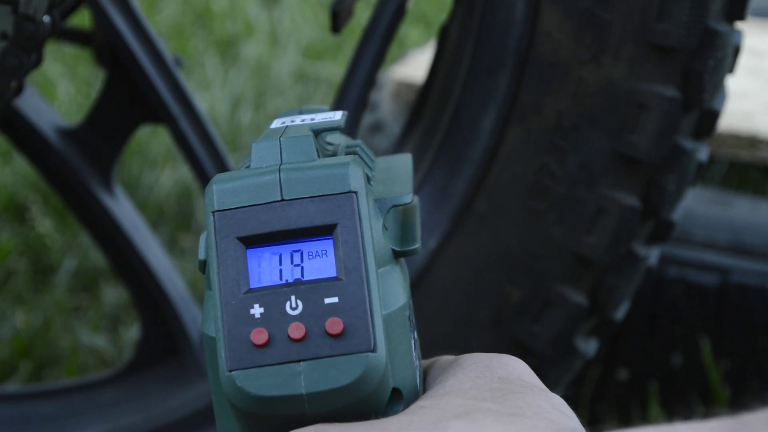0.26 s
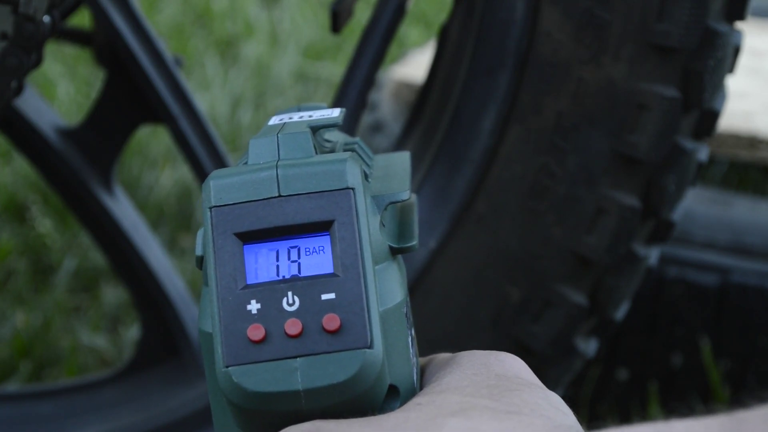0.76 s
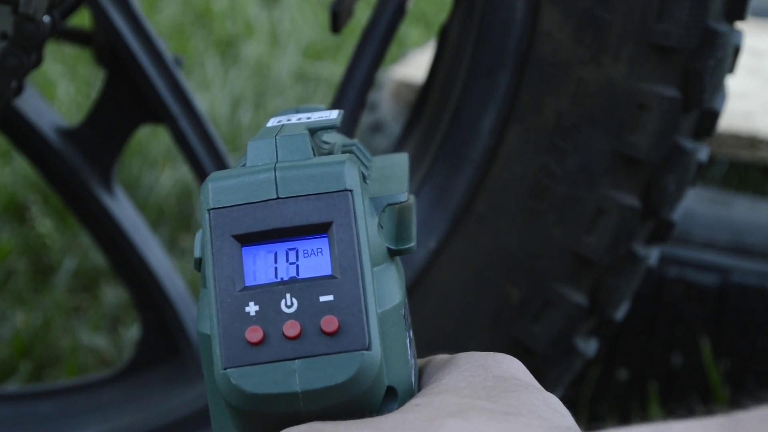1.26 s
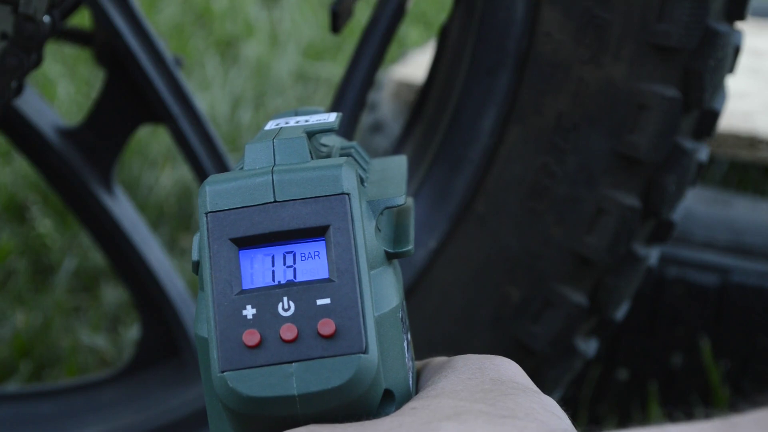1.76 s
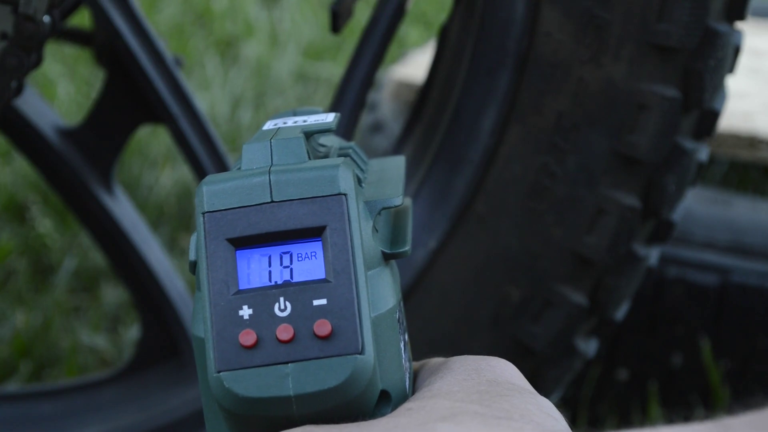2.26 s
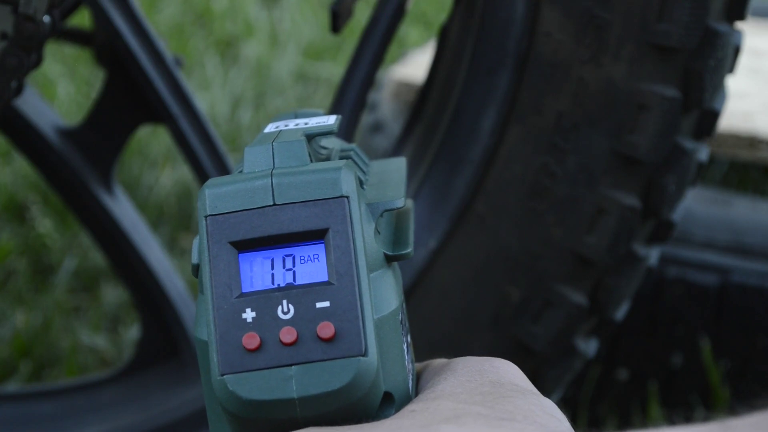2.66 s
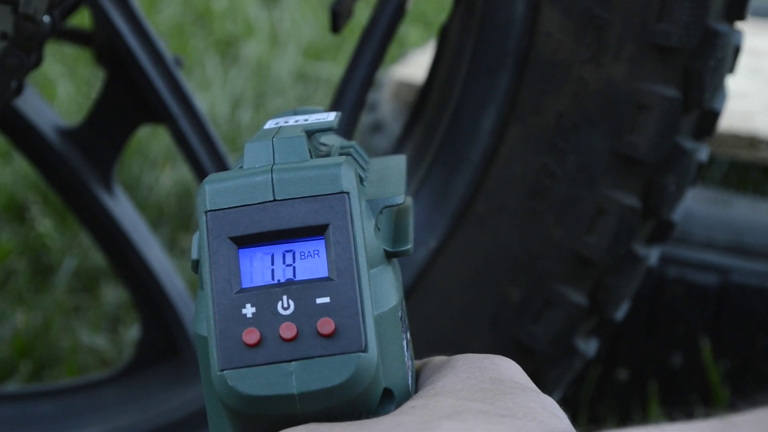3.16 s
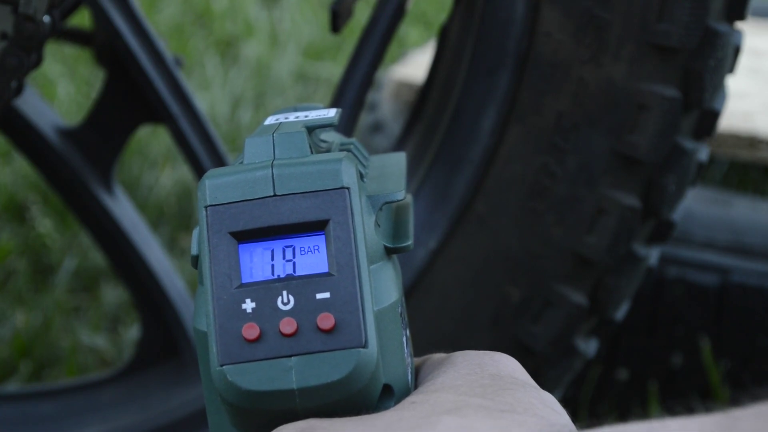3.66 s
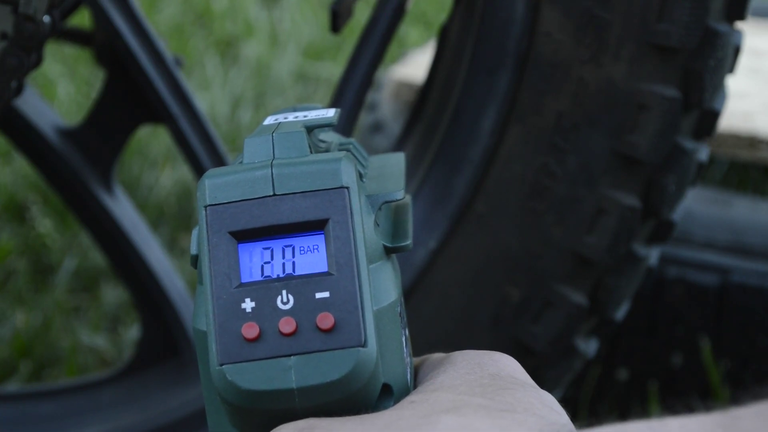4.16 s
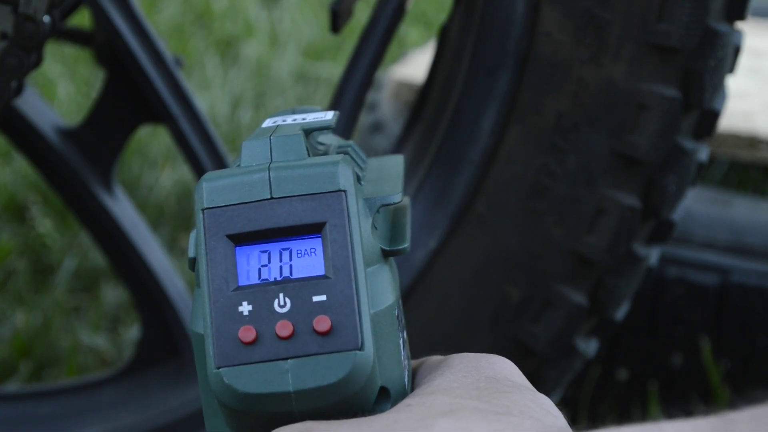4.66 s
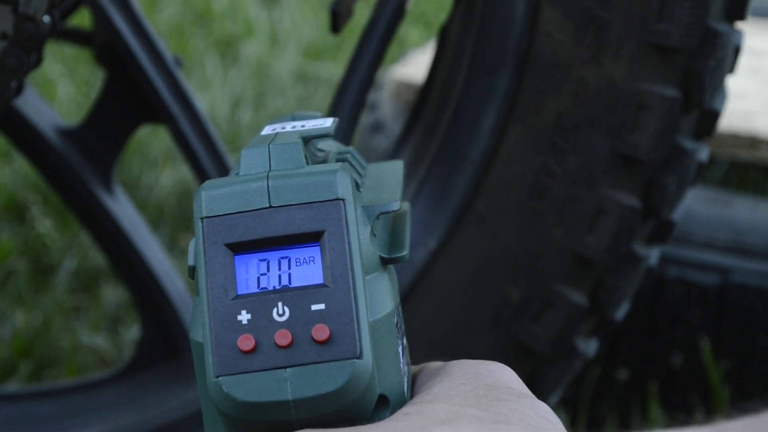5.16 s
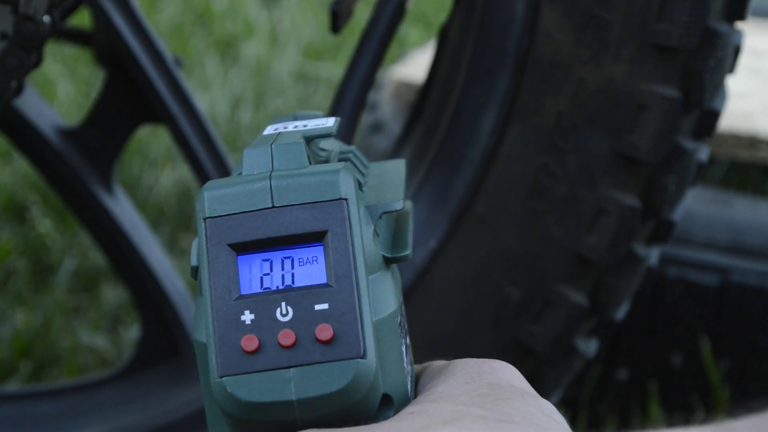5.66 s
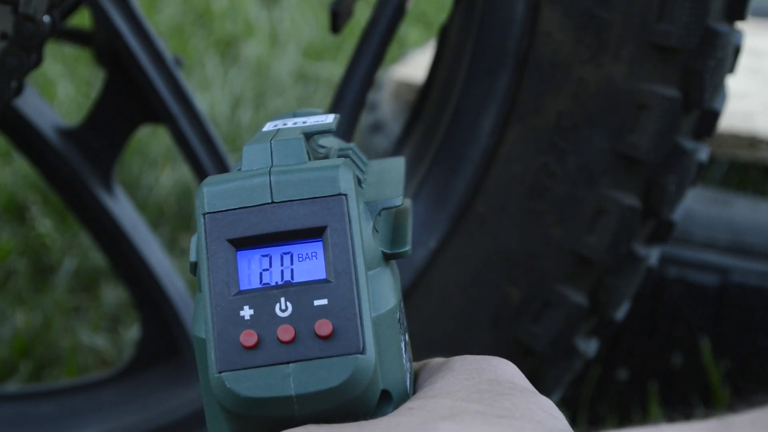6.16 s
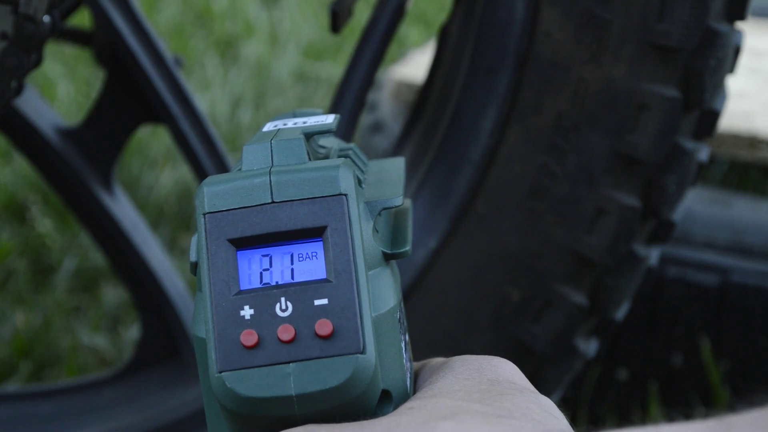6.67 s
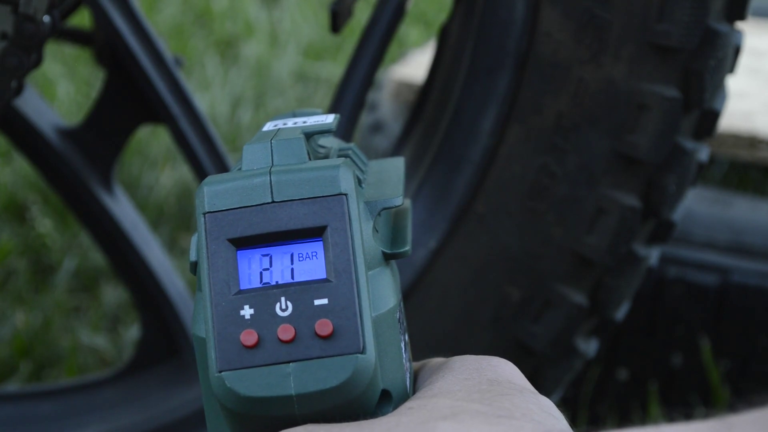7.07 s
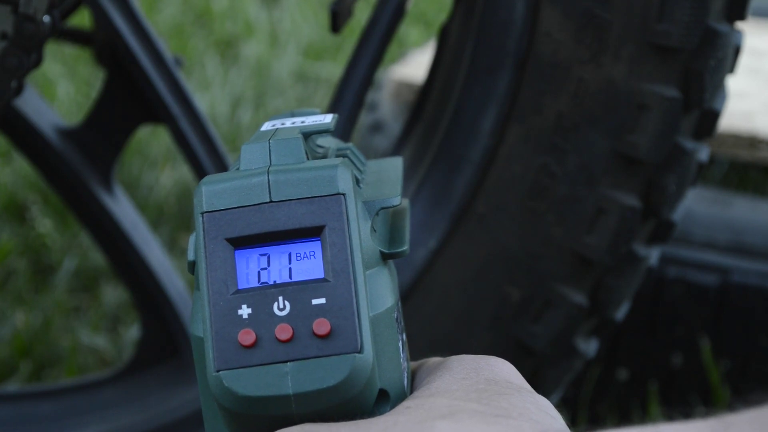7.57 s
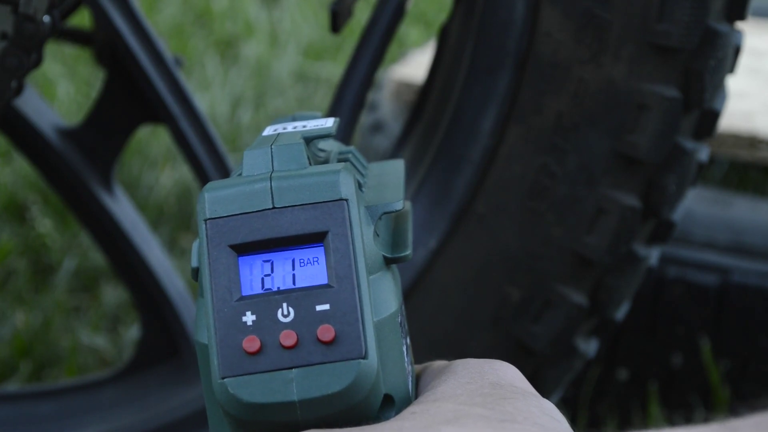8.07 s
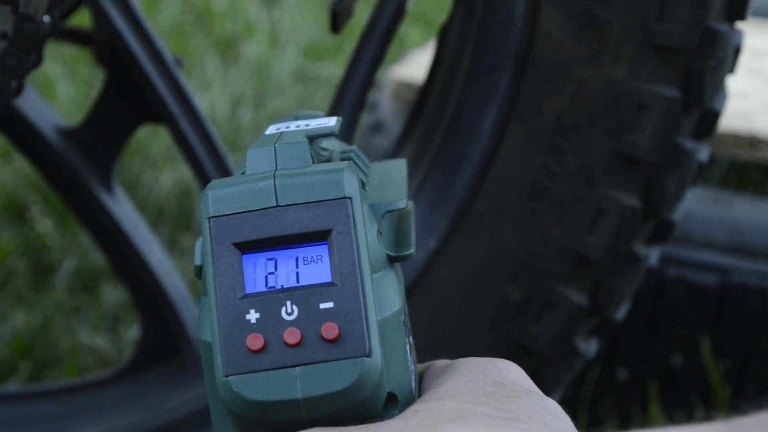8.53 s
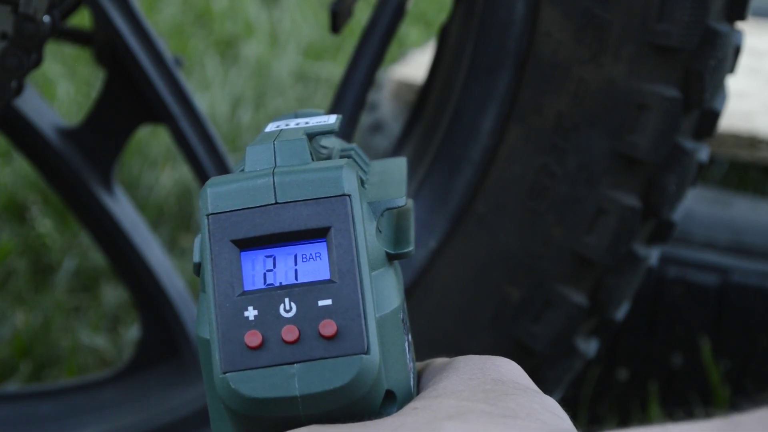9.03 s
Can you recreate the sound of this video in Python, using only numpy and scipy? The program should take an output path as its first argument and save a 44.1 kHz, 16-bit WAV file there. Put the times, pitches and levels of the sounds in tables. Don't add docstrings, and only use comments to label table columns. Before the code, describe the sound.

Loud, steady chatter of a cordless piston inflator working against pressure outdoors, while a faint distant engine fades behind it at the start.

```python
import sys
import numpy as np
from scipy import signal
from scipy.fft import rfft, irfft
from scipy.io import wavfile
from scipy.ndimage import uniform_filter1d

SR = 44100
rng = np.random.default_rng(int(sys.argv[2]) if len(sys.argv) > 2 else 0)


def convert_level_to_amplitude(level_db):
    exponent = np.asarray(level_db, float) / 20
    return 10 ** exponent


def master_out(mix):
    frames = np.transpose(np.atleast_2d(mix))
    ceiling = np.clip(frames, -1, 1)
    pcm = np.round(ceiling * 32767).astype(np.int16)
    wavfile.write(sys.argv[1], SR, pcm)


N = 410130

# time in s, speed in turns/min.
CRANK_SPEED = [(0, 3459.55), (.75, 3465.82), (1.5, 3465.19), (2.4, 3457.98), (3.15, 3465.27),
               (4.05, 3458.18), (4.65, 3460.08), (5.55, 3456.74), (6, 3458.66), (6.6, 3457.74),
               (7.2, 3451.64), (7.5, 3457.44), (8.55, 3454.77), (9.3, 3446.43)]
START_TURN = .0524
PINION_TEETH, WHEEL_TEETH = 11, 49
# time in s, length in s, lag in turns.
STUMBLE = (4.9, 0.017, 0.0053)

# start angle in turns, rise in turns, hold in turns, fall in turns, idle level in dB.
TEETH_STROKE = (0.53, 0.11, 0.24, 0.37, -17)
RATTLE_STROKE = (.35, .17, .24, .52, -17)
AIR_STROKE = (-0.1, 0.5, 0.6, 0.7, -2.5)
MESH_STROKE = (0.49, .2, 0.08, 0.34, -23)
# angle in turns, width in turns, level over full load in dB.
JOLTS = [
    (0.448, 0.014, -9),
    (.05, 0.028, -1),
]
# teeth in dB, rattle in dB, air in dB, mesh in dB.
JOLT_SHARE = (-1.5, -31, -23, -12)

# frequency in Hz, width in Hz, level in dB.
CASE_MODES = [(1426, 590, -6), (2023, 110, -8), (2672, 84, 1.5), (3220, 236, -1.5), (3778, 143, -4.5),
              (3990, 130, -11), (4530, 100, -8), (4890, 67, -13), (5970, 100, -20), (6360, 67, -41.5),
              (6800, 34, -12.5)]
# frequency in Hz, width in Hz, level in dB.
METAL_MODES = [(4240, 400, -1.5), (7300, 1200, -40), (8300, 120, 4.5), (8850, 200, 4), (9460, 320, 7),
               (10340, 220, 4), (10300, 190, -2), (11220, 160, 3.5), (12400, 600, -33), (13800, 1200, -26)]
# frequency in Hz, width in Hz, level in dB.
WHINE_MODES = [(2686, 113, 5.5), (3180, 410, -1.5), (4150, 120, -11), (4380, 73, -14), (5180, 91, -11.5),
               (5770, 300, -9), (6850, 91, -16), (7800, 110, -17), (8470, 110, -17), (8600, 220, -8),
               (9550, 190, -13.5), (9710, 210, -10), (10300, 190, -27), (11140, 150, -16)]
# time in s, frequency in Hz.
PANEL_MODE = [(0, 5570), (1, 5620), (3.4, 5586), (4.6, 5553), (9.3, 5470)]
KNOCKS = [
    (-.105, -0.103, -0.44),
    (-.004, 0.014, 1),
    (0.052, 0.066, -0.77),
    (0.093, 0.102, 0.77),
    (0.567, 0.565, -0.17),
]
# frequency in Hz, width in Hz, level in dB.
CYLINDER_MODES = [(278, 190, -7), (418, 59, -5.5), (510, 68, -8.5), (572.6, 35, 0), (706.3, 36, -2.5),
                  (813.5, 47, 1.5), (1150, 260, -8.5), (1022, 146, -4), (1475, 200, -6.5), (1960, 210, -6),
                  (3150, 370, -2)]
# frequency in Hz, density in dB per Hz.
HISS_COLOUR = [(330, -29), (750, -0.5), (1600, -4.5), (3100, 2), (4500, -2), (6000, -16.5), (9500, -12),
               (12000, -55)]
# crank order, rms level in dB, lag in turns.
SHAKE = [(1, -54, -0.0038), (2, -47, -0.12), (3, -61, -0.027), (4, -54.5, -0.038), (5, -54.5, 0.0092)]
# motor order, rms level in dB.
HUM = [(3, -51), (6, -67)]

# frequency in Hz, width in Hz, depth in dB.
DIPS = [(990, 33, -1.2), (1797, 133, -6.5), (2086, 54, -3), (2845, 118, -7.5), (4290, 90, -5),
        (5970, 210, -10), (7010, 620, -4), (7560, 560, -3), (10800, 300, -5), (11830, 260, -9),
        (14700, 500, -7)]
# time in s, speed in turns/s, level in dB.
FAR_ENGINE = [(0, 24.1, -58), (.6, 23.3, -59), (1.2, 21, -60), (1.5, 25.5, -68), (2.5, 27, -66),
              (3.2, 19, -68), (4.2, 22, -72), (5.2, 19.4, -76), (9.3, 18, -84)]
# engine order, level in dB.
ENGINE_ORDERS = [(2, -2), (3, -7), (4, -4), (5.5, -3), (6, -2), (6.5, -9), (8, -11), (9.5, -6), (10, -4)]
ROAD_OVER_ENGINE_DB, ROAD_FLOOR_DB, ROAD_SWELL_DB = 1.5, -77, 2


def crank():
    time_s, length_s, lag = STUMBLE
    stumble = lag * np.exp(-((np.arange(N) / SR - time_s) / length_s) ** 2)
    driven = np.cumsum(curve(CRANK_SPEED)) / 60 / SR
    return START_TURN - stumble + driven + 0.00073 * drift(900)


def surge(turns, depth, fastest=0.61):
    return turns + depth / (2 * np.pi) * np.sin(2 * np.pi * (turns - fastest))


def load(turns, stroke, jolt_db):
    start, rise, hold, fall, idle_db = stroke
    since = (turns - start) % 1
    full = np.clip(np.minimum(since / rise, (rise + hold + fall - since) / fall), 0, 1)
    jolts = 0
    for angle, width, db in JOLTS:
        off = (turns - angle + .5) % 1 - .5
        jolts = jolts + convert_level_to_amplitude(db) * np.exp(-(off / width) ** 2)
    return convert_level_to_amplitude(idle_db * (1 - full)) + convert_level_to_amplitude(jolt_db) * jolts


def gears(turns):
    us = SR * 1e-6
    mesh = WHEEL_TEETH * surge(turns, 0.1302)
    tooth = np.arange(np.ceil(mesh[0]), mesh[-1]).astype(int)
    at = np.interp(tooth, mesh, np.arange(N))
    angle = np.interp(at, np.arange(N), turns)
    wheel = rng.standard_normal((WHEEL_TEETH, 2))[tooth % WHEEL_TEETH].T
    pinion = rng.standard_normal((PINION_TEETH, 2))[tooth % PINION_TEETH].T
    jitter, rebound_jitter, rattle_spread = rng.standard_normal((3, len(tooth)))

    mesh_force = load(angle, MESH_STROKE, JOLT_SHARE[3]) * convert_level_to_amplitude(6.3 * wheel[1])
    steady = clicks(at + us * 25 * wheel[0], mesh_force)
    whine = convert_level_to_amplitude(-35.5) * ring(steady, WHINE_MODES)

    proud = clicks(at, 1. * (tooth % WHEEL_TEETH == 29))
    panel = convert_level_to_amplitude(-46) * resonate(proud, curve(PANEL_MODE), 94)

    strike = at + us * (16 * jitter + 22 * wheel[0] + 12 * pinion[0])
    force = load(angle, TEETH_STROKE, JOLT_SHARE[0]) * convert_level_to_amplitude(5 * wheel[1] + 1.1 * pinion[1])
    case = convert_level_to_amplitude(-28.5) * ring(clicks(strike, force), CASE_MODES)

    flutter = evened(uniform_filter1d(rng.standard_normal(len(tooth)), 120))
    rebound = strike + us * 30 * rebound_jitter
    chatter_db = 5 * rattle_spread + 1.4 * wheel[1] + 0.5 * flutter
    chatter = load(angle, RATTLE_STROKE, JOLT_SHARE[1]) * convert_level_to_amplitude(chatter_db)
    rattle = convert_level_to_amplitude(-44.5) * ring(clicks(rebound, chatter), METAL_MODES)
    return whine + panel + case + rattle


def valve(turns, jitter_turns=0.0027, spread_db=0.43):
    turn = np.arange(np.ceil(turns[-1]) + 1)[:, None]
    even, odd, strength = np.transpose(KNOCKS)
    jitter, spread = rng.standard_normal((2, len(turn), len(KNOCKS)))
    angle = turn + np.where(turn % 2, odd, even) + jitter_turns * jitter
    at = np.interp(angle, turns, np.arange(N), -99, N + 99)
    size = strength * convert_level_to_amplitude(spread_db * spread)
    return convert_level_to_amplitude(-33.5) * ring(clicks(at.ravel(), size.ravel()), CYLINDER_MODES)


def hiss(turns):
    hz, db = np.transpose(HISS_COLOUR)
    bins = np.fft.rfftfreq(N, 1 / SR)
    colour = convert_level_to_amplitude(np.interp(np.log(bins + 1), np.log(hz), db))
    air = rng.standard_normal(N) * load(turns, AIR_STROKE, JOLT_SHARE[2])
    return convert_level_to_amplitude(-35.5) * evened(irfft(rfft(air) * colour, N))


def shake_and_hum(turns):
    rotor = surge(turns, 0.016) * WHEEL_TEETH / PINION_TEETH
    shake = sum(convert_level_to_amplitude(db) * np.cos(2 * np.pi * order * (turns - lag)) for order, db, lag in SHAKE)
    hum = sum(convert_level_to_amplitude(db) * np.sin(2 * np.pi * order * rotor) for order, db in HUM)
    return np.sqrt(2) * (shake + hum)


def surroundings(x, scatter_db=-5, t60=0.038):
    bins = np.fft.rfftfreq(N, 1 / SR)
    dips_db = sum(db / (1 + (2 * (bins - hz) / width) ** 2) for hz, width, db in DIPS)
    t = np.arange(2000) / SR
    tail = rng.standard_normal(len(t)) * convert_level_to_amplitude(-60 * t / t60) * (t > .0004)
    tail = np.diff(tail, 2)
    paths = 1 + convert_level_to_amplitude(scatter_db) * rfft(tail / np.linalg.norm(tail), N)
    smear = paths / abs(paths)
    return irfft(rfft(x) * smear * convert_level_to_amplitude(dips_db), N)


def far_engine():
    turns = np.cumsum(curve(FAR_ENGINE)) / SR
    tones = 0
    for order, db in ENGINE_ORDERS:
        level = convert_level_to_amplitude(db + 2.5 * drift(5000))
        tones = tones + level * np.sin(2 * np.pi * (order * turns + rng.random()))
    return convert_level_to_amplitude(curve(FAR_ENGINE, axis=2)) * tones


def road():
    rumble = ring(rng.standard_normal(N), [(95, 30, -1), (135, 31, -6), (218, 31, -4)])
    rumble = ring(rumble, [(120, 120, 0)])
    level = convert_level_to_amplitude(curve(FAR_ENGINE, axis=2) + ROAD_OVER_ENGINE_DB) + convert_level_to_amplitude(ROAD_FLOOR_DB)
    return level * convert_level_to_amplitude(ROAD_SWELL_DB * drift(9000)) * rumble


def evened(x):
    return x / np.sqrt(np.mean(x ** 2) + 1e-20)


def drift(samples):
    noise = rng.standard_normal(N)
    return evened(uniform_filter1d(uniform_filter1d(noise, samples), samples))


def curve(rows, axis=1):
    rows = np.array(rows)
    return np.interp(np.arange(N) / SR, rows[:, 0], rows[:, axis])


def clicks(at, size):
    near = np.floor(at)[:, None] + np.arange(-8, 9)
    off = near - at[:, None]
    shape = np.sinc(off) * np.cos(np.pi * off / 18) ** 2
    ok = (near >= 0) & (near < N)
    return np.bincount(near[ok].astype(int), (size[:, None] * shape)[ok], N)


def ring(x, modes):
    hz = abs(np.fft.fftfreq(8192, 1 / SR))
    power = sum(convert_level_to_amplitude(db) ** 2 / (1 + ((hz ** 2 - f ** 2) / (hz + 1) / width) ** 2) for f, width, db in modes)
    log_gain = np.log(power + 1e-8) / 2
    taps = np.fft.ifft(np.exp(log_gain - 1j * signal.hilbert(log_gain).imag)).real
    return evened(signal.oaconvolve(x, taps[:4096])[:N])


def resonate(x, hz, width):
    carrier = np.exp(2j * np.pi * np.cumsum(hz) / SR)
    r = np.exp(-np.pi * width / SR)
    smooth = x / carrier
    for _ in range(2):
        smooth = signal.lfilter([1 - r], [1, -r], smooth)
    return evened((carrier * smooth).real)


def scene():
    turns = crank()
    pump = surroundings(gears(turns) + valve(turns) + hiss(turns)) + shake_and_hum(turns)
    return (pump + far_engine() + road())[None]


def roll_off(x):
    return signal.sosfilt(signal.butter(12, 15720, fs=SR, output="sos"), x)


def record(dry):
    ceiling = .136
    limited = dry / (1 + abs(dry / ceiling) ** 4) ** (1 / 4)
    droop = signal.firwin2(255, [0, 11000, 12500, 14500, SR / 2], convert_level_to_amplitude([0, -2, -4, -6, -12]), fs=SR)
    mix = signal.oaconvolve(limited, droop[None], "same")
    return roll_off(mix)


dry = scene()
out = record(dry)
master_out(out)
```